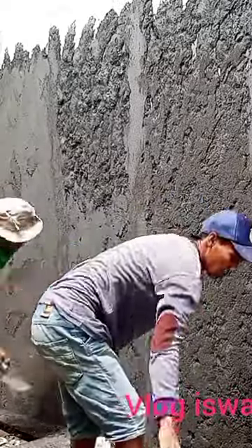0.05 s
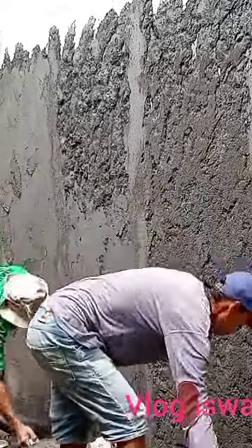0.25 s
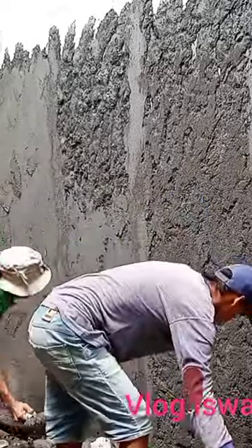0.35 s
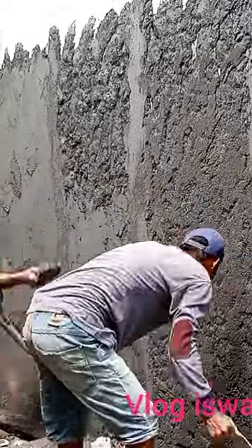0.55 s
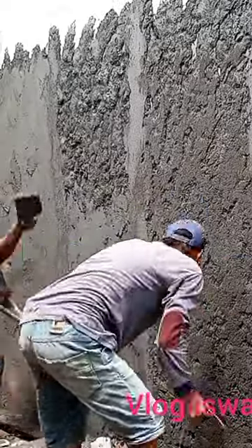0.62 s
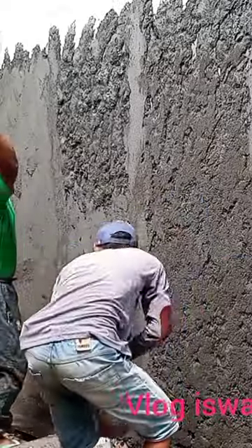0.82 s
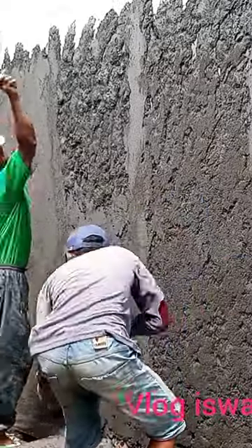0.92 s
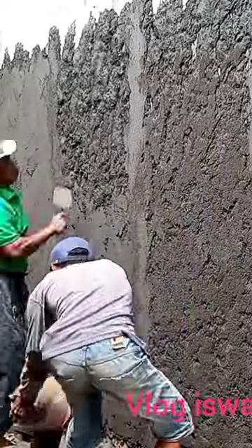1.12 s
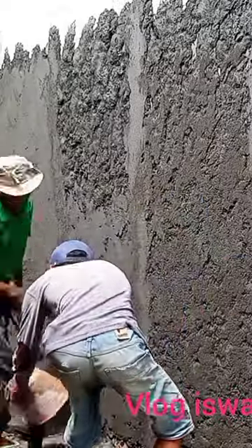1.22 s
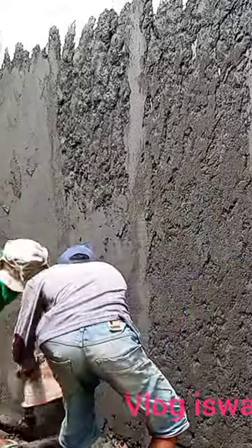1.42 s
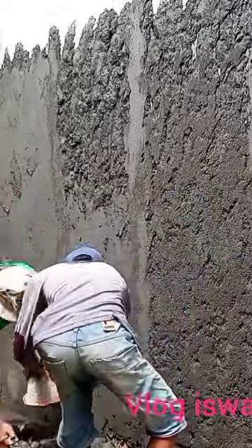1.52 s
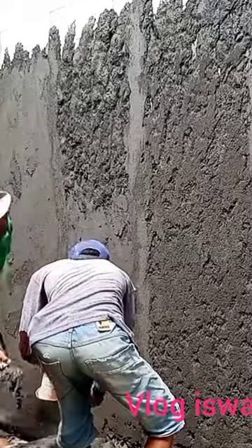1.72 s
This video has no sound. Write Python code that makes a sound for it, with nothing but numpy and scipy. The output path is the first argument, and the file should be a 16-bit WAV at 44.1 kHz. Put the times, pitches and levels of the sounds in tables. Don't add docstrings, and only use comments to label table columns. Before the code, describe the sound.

Plastering impacts on a quiet outdoor site: a trowel bumps a bucket, which rocks briefly, the blade ticks, a clustered mortar lump thuds on the wall, then faint grit scrapes; dry, close, muffled treble.

```python
import sys
import numpy as np
from scipy import signal
from scipy.fft import rfft, irfft
from scipy.io import wavfile
from scipy.ndimage import uniform_filter1d

SR = 44100
rng = np.random.default_rng(int(sys.argv[2]) if len(sys.argv) > 2 else 0)


def unload_audio(sound):
    columns = np.transpose(np.atleast_2d(sound))
    steps = np.round(np.clip(columns, -1, 1) * 32767)
    wavfile.write(sys.argv[1], SR, steps.astype(np.int16))


def elevation(decibels):
    levels = np.asarray(decibels, float)
    return 10 ** (levels / 20)


N = 77175

# (pitch [Hz], level at knock [dB], level at bounce [dB], time to fade by 60 dB [s])
BUCKET_MODES = [(462.5, -38, -25.5, 0.081), (520, -31.5, -35.5, 0.1), (565, -29.5, -42.5, 0.12),
                (815, -34.5, -51, 0.07), (947, -40.5, -50, 0.097), (1248, -28.5, -46.5, 0.085),
                (2122, -39.5, -57, 0.0605), (2599, -43.5, -51.5, .07)]
# (time [s], pitch [Hz], level [dB], fade time [s])
BUCKET_ROCKS = [
    (.302, 516, -35.5, .03),
    (.316, 455, -39, .03),
    (.328, 447, -47.5, 0.049),
    (.345, 503, -50, 0.059),
    (.379, 466, -58.5, 0.077),
    (1.131, 486, -55, 0.058),
]
# (time [s], centre [Hz], level [dB], hold [s], fade time [s])
LOOSE_GRIT = [(0.23, 900, -42, 0.03, 0.16), (0.37, 780, -80, 0.029, 0.055), (1.191, 1220, -68.5, 0.04, .05),
              (1.187, 520, -68, 0.023, .06), (0.035, 500, -71, 0.013, 0.042),
              (0.69, 1200, -70.5, 0.016, 0.044), (1.343, 590, -75, 0.028, .06),
              (1.455, 284, -66, 0.02, 0.055), (0.26, 45, -58.5, .05, .08), (1.11, 1350, -68.5, 0.052, .05),
              (1.095, 130, -51, 0.033, 0.043), (1.18, 122, -61.5, 0.027, 0.054), (1.2, 4700, -69, .08, .08),
              (1, 4800, -71, 0.017, 0.043), (0.076, 3100, -76, .005, .03),
              (1.026, 200, -46.5, 0.056, 0.077), (1.025, 45, -60, .04, .1), (1.56, 4500, -83.5, 0.13, .1),
              (.229, 5000, -50, 0.0068, 0.055), (1.62, 338, -80.5, 0.078, 0.13)]
# (time [s], level [dB])
MORTAR_LUMPS = [
    (1.0268, -29),
    (1.0328, -19),
    (1.043, -25),
]
# (pitch [Hz], level [dB], fade time [s])
WALL_MODES = [(151, -13.5, 0.063), (382, -12, 0.059), (461, -14, 0.17), (557, 0.5, 0.023),
              (680, -22, 0.023), (877, -28, 0.05)]
# (pitch [Hz], level [dB], fade time [s])
WET_MASS_MODES = [(80, -36.5, 0.056), (153.2, -33, 0.13)]
# (time of peak [s], level [dB], rise [s], fade time [s], centre [Hz])
GRIT_SPLATS = [(.046, -65, 0.0049, 0.057, 3100), (0.225, -40.5, .002, .05, 2240),
               (.237, -33, .01, 0.051, 3237), (1.025, -56, 0.0077, 0.05, 3510),
               (0.44, -56.5, 0.013, 0.075, 1243), (0.607, -58, 0.0096, 0.24, 2750),
               (0.62, -45, .005, 0.018, 2530), (.628, -42.5, .005, 0.079, 2800),
               (0.74, -77, .003, 0.015, 2800), (0.962, -60.5, 0.0062, 0.2, 2200),
               (1.029, -32, .003, 0.03, 2315), (1.036, -27, 0.0037, 0.037, 2883),
               (1.429, -65, .003, 0.091, 2810), (1.183, -50, .007, 0.05, 3386),
               (1.253, -59.5, 0.0084, 0.016, 2800), (1.352, -61, 0.0062, 0.036, 5500),
               (1.455, -71, 0.0093, 0.033, 1450), (1.606, -63.5, 0.0017, 0.036, 2520),
               (0.853, -66, .01, 0.12, 1600)]
# (start [s], length [s], level [dB], fade time [s], centre [Hz])
GRIT_SCUFFS = [(.0, 0.014, -70, 0.058, 2800), (0.084, 0.085, -69.5, 0.056, 2970),
               (0.137, 0.014, -73, 0.052, 1500), (0.186, 0.041, -60, .05, 2200),
               (0.233, 0.039, -41.5, 0.11, 3218), (0.636, 0.025, -55.5, 0.07, 3190),
               (1.025, 0.042, -45, 0.15, 3011), (0.389, 0.032, -68.5, 0.036, 4520),
               (0.509, 0.12, -74, 0.055, 3796), (0.785, 0.035, -68, 0.12, 2555),
               (1.008, .03, -93, 0.05, 2000), (1.101, 0.075, -68, 0.049, 2380),
               (1.184, 0.017, -59.5, .4, 3675), (1.246, 0.034, -71, 0.05, 3410),
               (1.34, 0.1, -72.5, 0.19, 3180), (1.421, 0.12, -68, 0.029, 2800),
               (1.494, 0.029, -59.5, 0.06, 2800), (1.55, 0.035, -77, 0.11, 2390),
               (1.607, 0.012, -82, 0.63, 2504)]
# (pitch [Hz], level [dB], width [Hz])
TROWEL_MODES = [(980, -11.5, 150), (1600, -5, 190), (2200, -8.5, 90), (2800, -5.5, 450), (3600, -6, 520),
                (4370, 3, 110), (4765, 2.5, 180), (6397, 0, 78)]
# (time [s], pitch [Hz], peak level [dB], fade time [s])
BLADE_PINGS = [(0.031, 6220, -55, 0.016), (.032, 9072, -51, 0.035), (.4, 4930, -64.5, 0.055),
               (0.453, 1266, -59.5, 0.033), (0.601, 3224, -50, 0.028), (.603, 2214, -50, 0.058),
               (.613, 977.7, -47.5, 0.15), (.613, 4510, -50, 0.041), (0.625, 980, -42.5, 0.016),
               (0.624, 2843, -41.5, 0.015), (.624, 3600, -43.5, 0.012), (.617, 2824, -43, .012),
               (.625, 4690, -49, .025), (.634, 2820, -44.5, .025), (.634, 1857, -51, .02),
               (.641, 4900, -60, 0.034), (.643, 3550, -52, .04), (.667, 3550, -60.5, 0.037),
               (.847, 3705, -60, .04), (.679, 2870, -63, 0.054), (1.178, 1480, -54, 0.025),
               (.615, 1920, -45.5, 0.017), (.615, 6500, -54.5, 0.085), (.09, 1600, -77, .3),
               (0.842, 3805, -53.5, 0.064), (0.958, 1441, -59, 0.082), (0.959, 2820, -59, 0.053),
               (0.96, 1890, -57, 0.081), (0.984, 625, -54.5, 0.044), (1.182, 949, -53, 0.015),
               (1.452, 606, -47.5, 0.016), (1.605, 2433, -73, 0.038)]
# (time [s],
# centre [Hz], level [dB], hold [s], fade time [s])
DULL_BUMPS = [(.0, 86, -64.5, 0.028, 0.083), (0.136, 500, -71, 0.027, .05),
              (0.206, 653, -53, 0.0092, 0.036), (0.229, 100, -47.5, 0.057, 0.091),
              (0.229, 298.6, -38.5, 0.02, 0.12), (0.336, 90.2, -73.5, 0.02, 0.1),
              (0.434, 305, -72.5, 0.0067, 0.1), (0.562, 103, -56, 0.016, 0.04),
              (0.626, 520, -57.5, 0.016, 0.12), (0.842, 403, -71.5, 0.018, 0.075),
              (.87, 90.9, -71, 0.052, 0.044), (1.029, 520, -38.5, 0.0087, 0.2),
              (1.255, 1400, -73.5, 0.042, 0.031), (0.03, 2800, -48.5, 0.0038, 0.048),
              (0.731, 2675, -62.5, 0.0094, 0.039), (1.62, 255.7, -89, 0.087, 0.29),
              (1.118, 496, -64.5, 0.012, 0.057), (1.148, 86.5, -57, .015, 0.067),
              (1.326, 308, -64.5, 0.019, 0.13), (1.357, 92, -69.5, 0.064, 0.09),
              (1.433, 560, -69, 0.067, 0.06), (1.514, 620, -69, 0.022, 0.052),
              (1.594, 296.6, -75.5, 0.024, 0.15)]
# (time [s], level [dB], hold [s], fade time [s])
TREBLE_BURSTS = [
    (0.228, -63.5, 0.0056, 0.068),
    (1.022, -60.5, 0.0061, 0.054),
    (1.034, -77, 0.015, 0.04),
    (1.356, -88, 0.016, 0.055),
    (1.499, -82.5, 0.022, 0.049),
    (1.441, -88, 0.036, 0.04),
]

KNOCK_S, BOUNCE_S, SAG_S = .2272, .274, 1.0385
THUD_RISE_S = 0.0028
RING_WOBBLE_DB, GRIT_PATCH_DB = 3, 0


def rms_one(x):
    return x / np.sqrt(np.mean(x ** 2) + 1e-20)


def drift(rate_hz):
    r = np.exp(-2 * np.pi * rate_hz / SR)
    settle = 8192
    noise = rng.standard_normal(N + settle)
    return rms_one(signal.lfilter([1], [1, -2 * r, r * r], noise)[settle:])


def shape(start, rise, hold, t60):
    out = np.zeros(N)
    first = int(max(start, 0) * SR)
    last = min(N, first + int((rise + hold + 2 * t60) * SR))
    t = np.arange(first, last) / SR - start
    swell = np.sin(np.pi / 2 * np.clip(t / rise, 0, 1)) ** 2
    fade = elevation(-60 * np.maximum(t - rise - hold, 0) / t60)
    out[first:first + len(t)] = swell * fade
    return out


def tone(start, hz, rise, hold, t60):
    t = np.arange(N) / SR - start
    return shape(start, rise, hold, t60) * np.sin(2 * np.pi * hz * t)


def coloured(x, hz, octaves, count=0):
    f = np.fft.rfftfreq(len(x), 1 / SR) + 1
    gain = np.ones(len(f))
    chimes = np.geomspace(hz / 6, hz * 3, count) * rng.uniform(.9, 1.1, count)
    for peak in chimes:
        level = elevation(5.5 + 7.2 * min(rng.standard_normal(), 1))
        gain += level / (1 + (2 * (f - peak) / 57) ** 2)
    for peak, db, width in TROWEL_MODES if count else []:
        level = elevation(db + 0.92 * rng.standard_normal())
        gain += level / (1 + (2 * (f - peak) / width) ** 2)
    bell = 1 + np.abs(np.log2(f / hz) / octaves) ** 2.036
    return rms_one(irfft(rfft(x) * gain / bell, len(x)))


def grit(start, rise, hold, t60, db, hz, octaves=1):
    size = 2 ** 14
    sand = rng.standard_normal(size) * elevation(2.5 * rng.exponential(1, size))
    out = np.zeros(N + size)
    first = int(max(start, 0) * SR)
    out[first:first + size] = coloured(sand, hz, octaves, count=24)
    return elevation(db) * out[:N] * shape(start, rise, hold, t60)


def bucket():
    out = elevation(-15) * tone(KNOCK_S, 447, rise=.011, hold=.024, t60=.032)
    for hz, knock_db, bounce_db, t60 in BUCKET_MODES:
        knock = elevation(knock_db) * tone(KNOCK_S, hz, 0.0066, 0, t60)
        bounce = elevation(bounce_db) * tone(BOUNCE_S, hz, .004, 0, t60)
        out = out + (knock + bounce) * elevation(RING_WOBBLE_DB * drift(70))
    return out


def rattle():
    notes = sum(elevation(db) * tone(s, hz, 0.004, 0.0029, t60) for s, hz, db, t60 in BUCKET_ROCKS)
    loose = sum(grit(s, THUD_RISE_S, hold, t60, db, hz, octaves=.25)
                for s, hz, db, hold, t60 in LOOSE_GRIT)
    return notes + loose


def wall():
    out = np.zeros(N)
    for k, (s, lump_db) in enumerate(MORTAR_LUMPS):
        for hz, mode_db, t60 in WALL_MODES:
            dulling_db = 1.8 * k * np.log2(hz / 150)
            chance_db = 1.8 * rng.standard_normal()
            level = elevation(lump_db + mode_db - dulling_db + chance_db)
            out += level * tone(s, hz, 0.38 / hz, 0, t60)
    return out


def wobble():
    out = np.zeros(N)
    for hz, db, t60 in WET_MASS_MODES:
        swing = elevation(db) * tone(SAG_S, hz, rise=0.0074, hold=0.027, t60=t60)
        out -= swing * elevation(RING_WOBBLE_DB * drift(28))
    return out


def mortar():
    splats = sum(grit(s - rise, rise, 0, t60, db, hz) for s, db, rise, t60, hz in GRIT_SPLATS)
    scuffs = np.zeros(N)
    for s, length, db, t60, hz in GRIT_SCUFFS:
        scuffs += grit(s, 0.0061 + .25 * length, .75 * length, t60, db, hz)
    return (splats + scuffs) * elevation(GRIT_PATCH_DB * drift(110))


def blade():
    pings = sum(elevation(db) * tone(s, hz, .003, .003, t60) for s, hz, db, t60 in BLADE_PINGS)
    return pings * elevation(2.3 * drift(150))


def bumps():
    return sum(grit(s, THUD_RISE_S, hold, t60, db, hz, octaves=0.44)
               for s, hz, db, hold, t60 in DULL_BUMPS)


def site():
    air_level = elevation(-78.5 + 2.3 * drift(15))
    air = air_level * coloured(rng.standard_normal(N), 2800, 4.5)
    rumble_level = elevation(-75.5 + 3.5 * drift(4.1))
    rumble = rumble_level * coloured(rng.standard_normal(N), 100, 0.68)
    return air + rumble


def scene():
    mix = mortar() + blade() + bumps() + bucket() + wall() + wobble() + site() + rattle()
    return mix[None]


def roll_off(x):
    return signal.sosfilt(signal.butter(12, 15470, fs=SR, output="sos"), x)


def record(dry):
    dull = signal.sosfilt(signal.butter(7, 5404, fs=SR, output="sos"), dry)
    power = uniform_filter1d(np.diff(dull, prepend=0) ** 2, size=512)
    loudness = np.abs(power) ** (0.36 / 2)
    swell = elevation(-87.5) * np.minimum(elevation(25) * loudness, 2)
    bursts = sum(elevation(db) * shape(s, 0.005, hold, t60) for s, db, hold, t60 in TREBLE_BURSTS)
    hiss = (swell + bursts) * rng.standard_normal(N)
    top_edge = signal.sosfilt(signal.butter(4, 14300, "high", fs=SR, output="sos"), hiss)
    hiss = hiss + elevation(8) * top_edge
    treble = signal.sosfilt(signal.butter(4, 6580, "high", fs=SR, output="sos"), hiss)
    top_cut = signal.cheby2(16, 40, 15700, fs=SR, output="sos")
    return roll_off(signal.sosfilt(top_cut, dull + treble))


dry = scene()
out = record(dry)
unload_audio(out)
```